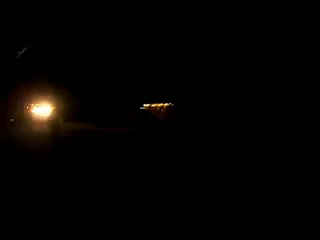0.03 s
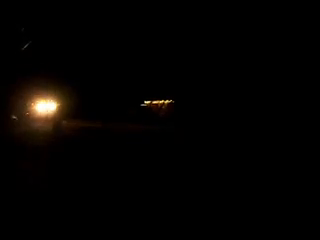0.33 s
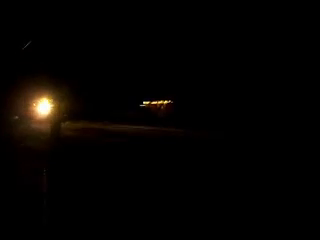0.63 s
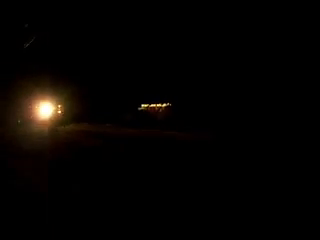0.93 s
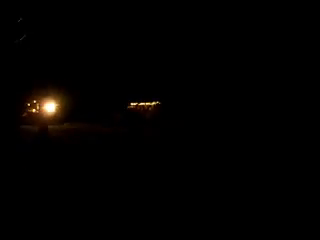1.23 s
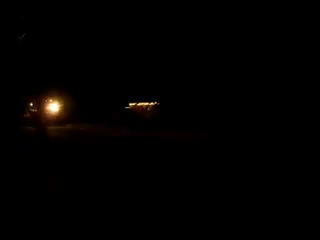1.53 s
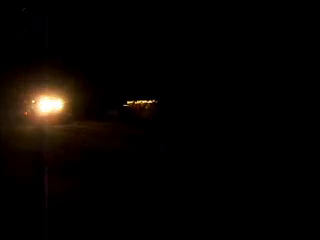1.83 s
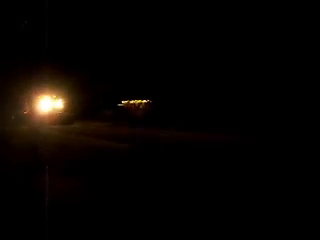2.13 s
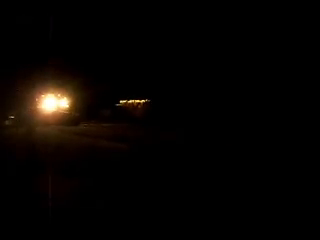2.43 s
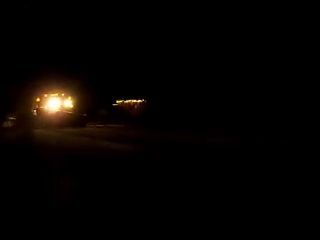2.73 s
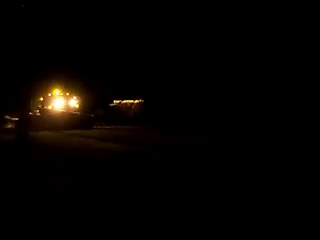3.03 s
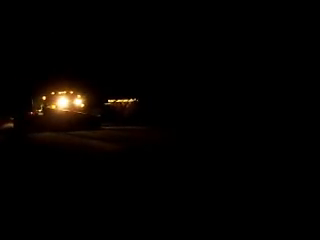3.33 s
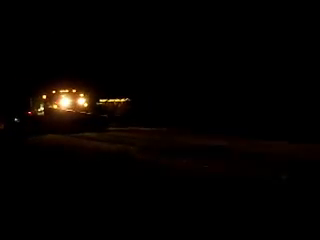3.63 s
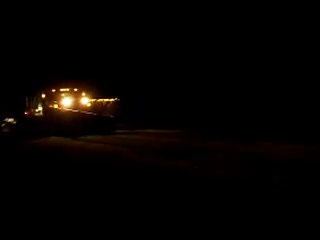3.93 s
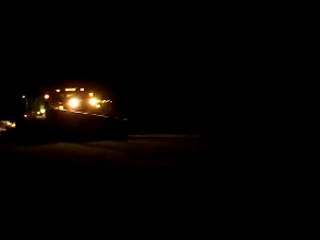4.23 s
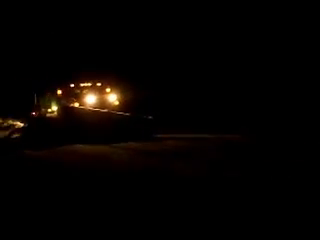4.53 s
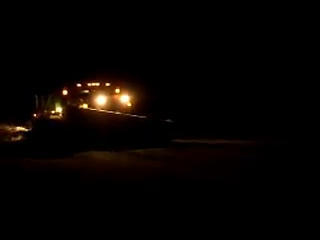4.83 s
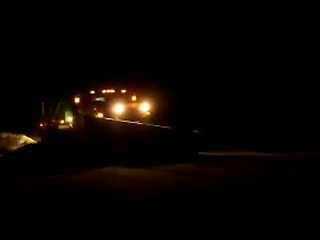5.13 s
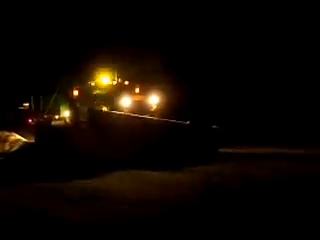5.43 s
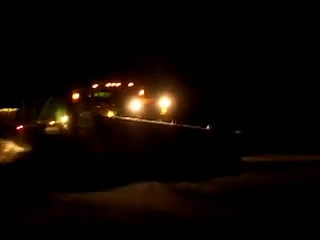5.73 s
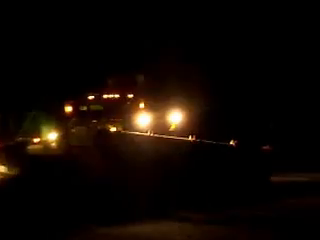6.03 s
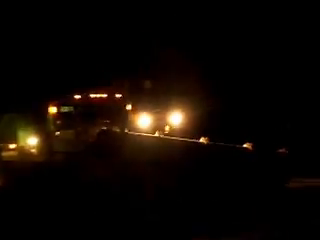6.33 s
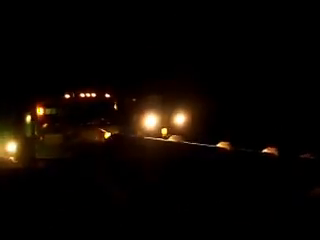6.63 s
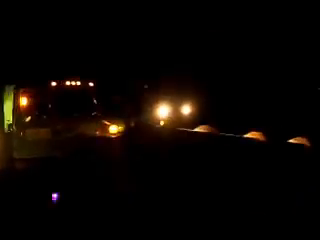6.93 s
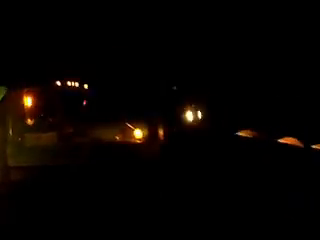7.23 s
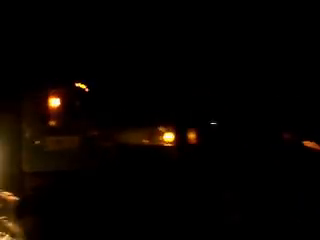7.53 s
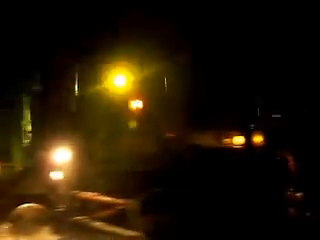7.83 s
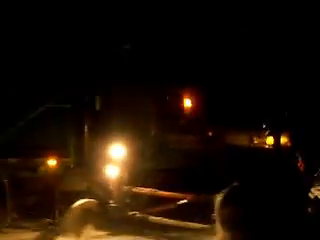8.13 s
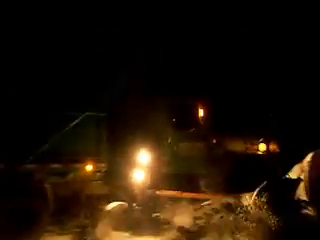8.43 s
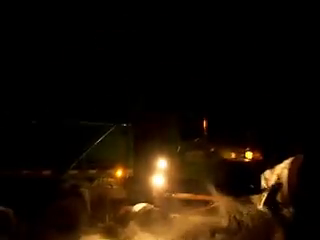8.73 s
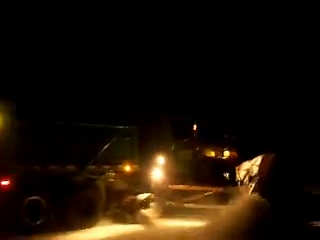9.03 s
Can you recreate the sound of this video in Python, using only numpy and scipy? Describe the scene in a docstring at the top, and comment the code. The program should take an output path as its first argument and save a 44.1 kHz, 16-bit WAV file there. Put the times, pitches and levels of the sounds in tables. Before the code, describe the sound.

Heard outdoors from a small roadside microphone, a plow blade grinds through snow and ice with irregular knocks, metal clinks and faint squeaks over a truck's low rumble. It grows louder as it nears, peaking in a deep, overloaded judder. Then the tyres thump by, the diesel engine drones past close with a slight fall in pitch, and a chain jingles softly.

```python
"""Beside a frozen road, one small camera microphone, 8.5 m from the line of a passing snowplow.
From far off the diesel drones, the tyres hum and the steel blade scrapes packed snow; it judders in three
low modes, knocks on ice, clinks its fittings and squeaks. Wheels thump in ruts as it nears. At 5.6 s the
strongest judder overloads the input, and at 6.3 s the blade is abreast. The engine and its fan come
forward as the cab goes by, around 7.5 s, and last a chain rattles behind the truck."""
import sys
import numpy as np
from scipy import signal
from scipy.fft import rfft, irfft, next_fast_len
from scipy.io import wavfile
from scipy.ndimage import map_coordinates

SR = 44100
rng = np.random.default_rng(int(sys.argv[2]) if len(sys.argv) > 2 else 0)


def bounce(signal):
    """Save signal as a 16-bit WAV file at the path given by the first command-line argument."""
    frames = np.transpose(np.atleast_2d(signal))
    limited = np.clip(frames, -1, 1)
    pcm = np.round(limited * 32767).astype(np.int16)
    wavfile.write(sys.argv[1], SR, pcm)


N = 400428
TIME = np.arange(N) / SR
# the truck drives straight past the microphone; the blade leads the engine
SPEED_M_PER_S, DISTANCE_M, BLADE_PASS_S, ENGINE_PASS_S = 12.5, 8.5, 6.3, 7.45
SOUND_M_PER_S = 343


def amp(db):
    """Decibels to gain."""
    return 10 ** (np.asarray(db) / 20)


def unit(x):
    """Scale to rms 1."""
    return x / np.sqrt(np.mean(x ** 2) + 1e-20)


def curves(rows):
    """One value per sample for each column after the time."""
    times, *columns = np.transpose(rows)
    return [np.interp(TIME, times, column) for column in columns]


def wobble(rate):
    """A smooth random curve, rate knots a second."""
    knots = rng.standard_normal(int(N * rate / SR) + 4)
    return map_coordinates(knots, [TIME * rate])


def coloured(x, points):
    """Filter x through points of f/Hz, gain/dB, joined on a log axis."""
    size = next_fast_len(len(x) + 8192)
    hz, db = np.transpose(points)
    gain = amp(np.interp(np.log(np.fft.rfftfreq(size, 1 / SR) + 1), np.log(hz), db))
    return irfft(rfft(x, size) * gain, size)[:len(x)]


def noise(points):
    """Coloured noise of rms 1."""
    return unit(coloured(rng.standard_normal(N), points))


def running_phase(hz):
    """The phase in radians of a moving frequency."""
    return 2 * np.pi * np.cumsum(hz) / SR


def ring(hz, width_hz, count):
    """A mode that keeps being disturbed, which widens it."""
    drift = np.cumsum(rng.standard_normal(count)) * np.sqrt(2 * np.pi * abs(width_hz) / SR)
    return np.sin(2 * np.pi * hz * np.arange(count) / SR + drift)


def struck(t, db, t60, attack_s):
    """The envelope of a blow: a quick rise, then 60 dB of decay in t60 seconds."""
    return amp(db - 60 * t / t60) * (1 - np.exp(-t / attack_s))


def add(track, s, sound):
    """Mix a sound into the track at s seconds."""
    part = track[max(round(s * SR), 0):][:len(sound)]
    part += sound[:len(part)]


def approach(pass_s):
    """Closeness (1 when abreast) and speed in m/s towards the microphone of a part of the truck."""
    ahead = SPEED_M_PER_S * (pass_s - TIME)
    distance = np.hypot(ahead, DISTANCE_M)
    return DISTANCE_M / distance, SPEED_M_PER_S * ahead / distance


# the diesel from the roadside: t/s, firing tone level/dB, exhaust drone level/dB
ENGINE_LEVELS = [(0, -40, -54), (4.5, -40.5, -45), (6, -26.5, -38), (7, -25, -33.5), (7.4, -27, -29),
                 (7.66, -38, -28), (7.76, -29, -30.5), (7.9, -26, -31), (8.3, -25.5, -39), (8.7, -28, -41),
                 (9.08, -36, -40)]
# colour of the exhaust: f/Hz, level/dB
EXHAUST_SPECTRUM = [(60, -31.5), (105, 0), (138, 4), (165, -8), (230, -10.5), (400, -28.5), (620, -18.5),
                    (820, -24), (1100, -22.5), (1600, -36.5), (2500, -36.5), (4000, -58.5)]


def engine(firing_hz, roughness, tone_db, drone_db):
    """Six cylinders fire in turn: a low tone and uneven exhaust puffs, sinking in pitch as they pass."""
    tone_level, drone_level = curves(ENGINE_LEVELS)
    _, towards = approach(ENGINE_PASS_S)
    doppler_hz = firing_hz / (1 - towards / SOUND_M_PER_S)
    phase = running_phase(doppler_hz + .25 * wobble(8))
    fired = np.flatnonzero(np.diff(phase // (2 * np.pi)))
    cylinders = amp(2.5 * rng.standard_normal(size=6))
    puffs = np.zeros(N)
    puffs[fired] = np.resize(cylinders, len(fired)) * amp(2 * rng.standard_normal(N)[fired])
    gas = noise(EXHAUST_SPECTRUM) * (1 + .5 * np.cos(phase))
    drone = unit(unit(coloured(puffs, EXHAUST_SPECTRUM)) + roughness * gas)
    return amp(tone_level + tone_db) * np.sqrt(2) * np.sin(phase) + amp(drone_level + drone_db) * drone


# tread hum, strongest while the truck is still up the road: t/s, level/dB
TREAD_LEVELS = [(0, -48.5), (2.4, -44), (3.4, -35.5), (4.3, -41.5), (5.3, -34), (6.2, -48), (7, -56),
                (9.08, -61)]


def tread(hz, width_hz, level_db):
    """The tread blocks strike the road at an even rate and hum."""
    hum = coloured(ring(hz, width_hz, N), [(120, -31), (220, 0), (310, 0.5), (600, -29.5)])
    return amp(curves(TREAD_LEVELS)[0] + level_db + 2.5 * wobble(12)) * unit(hum)


# rumble of tyres and chassis: t/s, level/dB
RUMBLE_LEVELS = [(0.1, -35), (2.5, -37.5), (3.3, -32.5), (3.7, -35.5), (4.3, -33.5), (5.1, -31),
                 (5.9, -25.5), (6.4, -30.5), (6.65, -25), (7.2, -33), (7.5, -31.5), (7.66, -32),
                 (7.78, -31.5), (8.0, -33), (8.15, -31.5), (8.65, -41.5), (9.08, -35.5)]
# its colour: f/Hz, level/dB
RUMBLE_SPECTRUM = [(70, -21.5), (130, -10.5), (200, -1), (260, 0.5), (310, -4), (380, -10), (600, -51.5)]


def tyres(rise_db, level_db, jolt_share):
    """Heavy tyres drum on the frozen ruts; each bite of the blade jolts the chassis."""
    rumble_db = curves(RUMBLE_LEVELS)[0] + level_db + jolt_share * rise_db + 1.5 * wobble(14)
    return amp(rumble_db) * noise(RUMBLE_SPECTRUM)


def crunch(per_s, spread_db, decay_s, share):
    """Snow breaks in small fractures: bursts of white noise that decay fast, over an even bed."""
    breaks = (rng.random(N) < per_s / SR) * amp(spread_db * np.clip(rng.standard_normal(N), -2, 2)) ** 2
    power = signal.lfilter([1], [1, -np.exp(-1 / (decay_s * SR))], breaks)
    return np.sqrt(1 - share + share * power / power.mean()) * rng.standard_normal(N)


def grit(count, low_hz, high_hz, t60, spread_db):
    """Stones caught under the edge make it tick at ever different pitches, the highest weakest."""
    out, t = np.zeros(N), np.arange(SR // 10) / SR
    for when, pitch, size in rng.random((count, 3)):
        hz = low_hz * (high_hz / low_hz) ** pitch
        envelope = np.sqrt(low_hz / hz) * amp(spread_db * size - 60 * t / t60)
        add(out, when * N / SR, envelope * np.sin(2 * np.pi * hz * t))
    return unit(out)


# how far the blade has turned from the microphone, shielded by the truck: t/s, share (0-1)
TURNED_AWAY = [(0, 0), (2.3, 0.26), (5.1, 0.62), (5.7, 0.91), (7.3, 0.95), (9.08, 0.77)]


def turning(x, ahead, passed):
    """The blade's sound changes colour as it swings from facing the microphone to passing by."""
    share = curves(TURNED_AWAY)[0]
    return (1 - share) * unit(coloured(x, ahead)) + share * unit(coloured(x, passed))


# the cutting edge on the road: t/s, grinding level/dB, snow spray level/dB
SCRAPE_LEVELS = [(0.25, -30, -35), (0.62, -31.5, -35), (0.98, -31.5, -35.5), (1.92, -29, -34.5),
                 (2.44, -31, -38), (3.35, -28, -31.5), (3.62, -30.5, -35), (5.02, -28, -36.5),
                 (5.19, -29, -39), (5.83, -31, -37), (6.37, -30.5, -41), (6.67, -30.5, -39),
                 (7.5, -36, -42), (7.65, -35, -42), (7.85, -36, -43), (8.35, -35.5, -42), (8.6, -35, -42),
                 (9.08, -36.5, -40)]
# grinding and spray, facing the microphone and turned away: f/Hz, level/dB
GRIND_FACING = [(250, -29.5), (390, -7), (490, 1), (660, 0), (790, -5), (920, -5), (1080, -3), (1300, -6),
                (1480, -14), (1800, -14.5), (2200, -23.5), (3200, -33.5)]
GRIND_AWAY = [(250, -33.5), (390, -6), (480, 5.5), (545, 3), (600, 3), (730, 1.5), (860, -9), (1060, -4.5),
              (1250, -8), (1480, -18.5), (1750, -18.5), (2200, -28), (3200, -44)]
SPRAY_FACING = [(900, -27.5), (1350, -2), (1750, 6), (2100, 2.5), (2450, 1), (2900, 0.5), (3900, -2.5),
                (4600, -4), (5400, -8), (7500, -10)]
SPRAY_AWAY = [(900, -33.5), (1700, 3), (2100, -0.5), (2430, 3), (2800, -1), (3300, -2.5), (3900, 0),
              (4600, -5), (5400, -5), (7500, -8)]


def scrape(rise_db, grind_db, spray_db, spray_share, grit_db, grit_shield_db, bounce_db):
    """The edge crushes packed snow; its changing pressure moves the grinding and the spray together."""
    grind_level, spray_level = curves(SCRAPE_LEVELS)
    pressure_db = bounce_db * wobble(28)
    coarse = crunch(per_s=120, spread_db=1.0, decay_s=0.0088, share=0.31)
    fine = crunch(per_s=740, spread_db=2.0, decay_s=0.0014, share=0.7)
    stones = grit(count=1100, low_hz=1069, high_hz=4490, t60=0.077, spread_db=14.5)
    grind = turning(coarse, GRIND_FACING, GRIND_AWAY)
    spray = turning(coarse + fine, SPRAY_FACING, SPRAY_AWAY)
    spray += amp(grit_db + grit_shield_db * curves(TURNED_AWAY)[0]) * stones
    grind *= amp(grind_level + grind_db + rise_db + pressure_db)
    spray *= amp(spray_level + spray_db + spray_share * rise_db + .5 * pressure_db)
    return grind + spray


# the blade digs in: t/s, hold/s, judder level/dB, mode (0-2), rise of the scraping/dB
BLADE_BITES = [(0.082, 0.069, -24, 2, 1.5), (0.212, 0.093, -26, 0, 3.5), (0.391, 0.086, -23.5, 0, 3),
               (0.418, 0.12, -27, 2, 0), (0.57, 0.1, -21.5, 0, 1.5), (0.7, 0.11, -34, 1, 2.5),
               (1.045, 0.19, -26.5, 1, -0.5), (1.359, 0.12, -28.5, 0, 3.5), (1.543, 0.11, -32, 1, 0),
               (1.786, 0.11, -18.5, 1, 1), (1.909, 0.078, -22, 0, 3.5), (2.044, 0.16, -25.5, 1, 1),
               (2.93, .12, -23.5, 1, 2), (3.081, 0.13, -18.5, 1, 3), (3.218, 0.12, -17.5, 0, 2.5),
               (3.326, 0.21, -21.5, 1, 0.5), (3.549, 0.21, -31.5, 1, -0.5), (3.854, 0.076, -25.5, 1, 0.5),
               (4.06, .11, -23, 1, 0.5), (4.39, 0.29, -34, 0, 0.5), (4.678, 0.27, -31, 1, 3.5),
               (5.088, 0.11, -21.5, 1, 5), (5.472, 0.05, -16, 2, 2.5), (5.569, 0.257, -7, 1, 5.5),
               (5.861, 0.24, -19.5, 1, 3), (6.121, 0.075, -17.5, 0, 1), (6.413, 0.17, -16, 1, 2),
               (6.521, 0.058, -12.5, 0, 4.5), (6.628, 0.032, -10, 0, 4.5), (6.674, .07, -14.5, 1, 2),
               (6.78, 0.14, -18.5, 2, 0), (6.822, 0.093, -15, 0, 4.5), (6.963, 0.087, -25, 2, 3),
               (7.203, 0.16, -26, 0, 2.5), (7.414, 0.079, -25.5, 0, 5)]


def bites(attack_s, release_s, sag_db_per_s):
    """Each bite builds, holds and dies away: gives each judder mode's drive and the scraping's rise."""
    drive, rise_db, t = np.zeros((len(LOW_MODES), N)), np.zeros(N), np.arange(SR) / SR
    for s, hold, db, mode, scrape_db in BLADE_BITES:
        release = np.exp(-np.maximum(t - hold, 0) / release_s)
        shape = np.minimum(t / attack_s, 1) * amp(-sag_db_per_s * t) * release
        add(drive[mode], s, amp(db) * shape)
        add(rise_db, s, scrape_db * shape)
    return drive, rise_db


# the blade's judder modes: f/Hz, unsteadiness/Hz, level between bites/dB
LOW_MODES = [(50.1, 3.45, -48), (66.46, 1.513, -38), (95.2, 6.09, -44.5)]


def judder(drive, level_db, frame_db, near_db, behind_db, crosstalk_db, strain_limit_db):
    """The blade sticks and slips, shaking its frame in three modes; once past, the truck hides it."""
    closeness, towards = approach(BLADE_PASS_S)
    receding = np.maximum(-towards / SPEED_M_PER_S, 0)
    nearness = amp(near_db * closeness + behind_db * receding)
    # every bite stirs all three modes and the frame, up to a limit
    strain = np.minimum(drive.sum(0), amp(strain_limit_db))
    shake = np.zeros(N)
    for (hz, drift_hz, idle_db), bite in zip(LOW_MODES, drive):
        idle = amp(idle_db + 3.4 * wobble(9)) * nearness
        size = np.sqrt(bite ** 2 + idle ** 2 + (amp(crosstalk_db) * strain) ** 2)
        shake += size * np.sqrt(2) * np.sin(running_phase(hz + drift_hz * wobble(16)))
    # the rough road shakes the frame between its modes too
    frame = noise([(12, -28), (28, -11.5), (42, 1), (60, 0), (105, -6), (140, -27), (400, -69.5)])
    return amp(level_db) * shake + np.hypot(amp(frame_db) * strain, amp(-38.5) * nearness) * frame


# blade on ice: t/s, level/dB, t60/s, relative crack/dB, upper modes/dB, favoured f/Hz
ICE_KNOCKS = [(.105, -27, .2, -6, 3, 1000), (.208, -23, .2, -9, -1, 1140), (.238, -22, 0.17, -14, -6, 1140),
              (.31, -26, 0.14, -14, -4, 550), (.41, -27, 0.31, -13, 3, 1010), (.59, -27, 0.22, -8, 6, 1820),
              (.725, -20, 0.17, -8, 2, 1820), (.8, -25.5, .18, -1, -6, 485),
              (1.238, -22.5, 0.31, -21, -4.5, 485), (1.798, -16, 0.14, -17, -11, 650),
              (2.072, -22, 0.082, 0, -4, 1325), (2.084, -21.5, .26, -12, 5, 1140),
              (2.86, -23.5, 0.24, -22, -19, 485), (3.161, -26, 0.065, 7, -8, 550),
              (3.172, -13, .19, -21.5, -4, 550), (3.259, -19, 0.14, 4, 7, 1820),
              (3.327, -18.5, 0.19, -2, 5, 1140), (3.408, -22, .07, 4, -4, 650),
              (3.473, -27, .05, 6, -2, 650), (3.978, -22.5, 0.28, -3.5, -5.5, 1325),
              (4.119, -24, .28, -20, -2, 1140), (4.318, -22.5, .17, -3.5, -7, 485),
              (4.548, -20, .11, -23, -21, 550), (4.572, -21.5, 0.18, -6, -4, 650),
              (4.612, -16.5, 0.18, -23, -15, 550), (4.675, -13, 0.14, -7, 0.5, 550),
              (4.752, -14, 0.18, -5, 1, 1010), (4.814, -18.5, 0.21, -8, 3, 1325),
              (4.885, -17, 0.16, -5.5, 4, 650), (4.93, -21, .14, -13, -9, 650),
              (4.968, -24, .12, -14, 10, 1630), (5.043, -10, 0.16, -6.5, -4, 650),
              (5.376, -21.5, 0.19, -19, -4, 650), (5.563, -15, 0.13, -14, -10, 645),
              (5.64, -20.5, 0.39, -10, 2, 1820), (5.724, -22, 0.26, 9, -7, 765),
              (5.841, -18.5, 0.36, -17, -9, 765), (5.915, -16.5, .18, -17, -15, 485),
              (6.156, -16.5, 0.27, -9, -11, 485), (6.33, -23.5, .16, -21, -15, 550),
              (6.498, -16.5, 0.14, -25, -24, 485), (6.535, -19, .069, 4, -9, 650),
              (6.558, -23, 0.053, -2, -15, 550), (6.623, -13, .11, -4, -20, 650),
              (6.653, -11.5, 0.12, -16, -14, 650), (6.7, -22, 0.13, -1, -8, 650),
              (6.733, -16, 0.25, -27, -26, 550), (6.861, -29, .16, 7, -12, 650),
              (6.888, -20, 0.21, -4, -5, 1630)]
# the blade's plate modes: f/Hz, width/Hz, level/dB
PLATE_MODES = [(487.7, 22, -6.5), (550.4, 19, -3), (644, 24, -4), (768, 33, -5.5), (913, 49, 0),
               (1011, 21, 0), (1144, 25, 0), (1325, 46, 0), (1633, 31, -5), (1850, 37, -4.5),
               (2440, 140, -13), (3490, 52, -13), (4020, 120, -13.5), (4900, 30, -18.5)]
# colours of a knock's thud and of its sharp crack: f/Hz, level/dB
THUD_SPECTRUM = [(150, -29.5), (450, -11), (650, -5), (1150, 10.5), (1500, -1.5), (2100, -3), (3000, -19.5),
                 (4000, -14.5), (5200, -21.5), (7500, -14.5)]
CRACK_SPECTRUM = [(300, -22), (1000, -5), (2200, 0.5), (3000, -5.5), (4000, -2), (5200, -7.5), (7500, -7)]


def knocks(level_db, attack_s, vary_db, thud_db, thud_share, favour_db, favour_octaves):
    """Ice ridges crack against the snow-damped plate; the point of contact picks which mode rings most."""
    out, t = np.zeros(N), np.arange(SR // 3) / SR
    for s, db, t60, crack_db, upper_db, favoured_hz in ICE_KNOCKS:
        modes = np.zeros(len(t))
        for hz, width_hz, mode_db in PLATE_MODES:
            contact_db = favour_db * np.exp(-(np.log2(hz / favoured_hz) / favour_octaves) ** 2)
            # the upper modes radiate forwards: weaker off axis, and when the blow is soft
            gain = amp(mode_db + contact_db + upper_db * (hz > 850) + vary_db * rng.standard_normal())
            modes += gain * ring(hz, width_hz, len(t))
        thud = unit(coloured(rng.standard_normal(len(t)), THUD_SPECTRUM))
        thud *= amp(thud_db + thud_share * upper_db)
        crack = unit(coloured(rng.standard_normal(len(t)), CRACK_SPECTRUM))
        crack *= amp(crack_db - 40 * t / t60)
        add(out, s, struck(t, db + level_db, t60, attack_s) * (unit(modes) + thud + crack))
    return out


# jolts to the steel fittings: t/s, level/dB, fitting
FITTING_JOLTS = [(.412, -30.5, "shackle"), (.49, -31.5, "shackle"), (1.392, -37.5, "pin"),
                 (1.517, -39, "pin"), (2.074, -22, "bracket"), (3.092, -27.5, "shackle"),
                 (3.262, -17.5, "linkage"), (3.409, -31, "bracket"), (3.409, -33.5, "pin"),
                 (3.66, -36, "pin"), (3.697, -39, "pin"), (3.845, -34.5, "pin"), (5.501, -33.5, "shackle"),
                 (5.571, -17, "linkage"), (5.656, -26, "shackle"), (5.758, -32, "shackle"),
                 (5.859, -29.5, "shackle"), (6.16, -24, "linkage"), (6.566, -30, "linkage"),
                 (6.896, -29.5, "linkage"), (7.434, -34.5, "shackle"), (7.478, -31, "chain"),
                 (8.44, -36, "chain"), (8.475, -42, "chain"), (8.515, -43, "chain"), (8.582, -31, "chain"),
                 (8.603, -39, "chain"), (8.675, -44, "chain"), (8.742, -35, "chain"), (8.974, -40, "chain")]
# each fitting's modes, widened by its chatter: f/Hz, level/dB, t60/s, width/Hz
FITTING_MODES = {"bracket": [(1130, -3, 0.24, 30), (1673, -0.5, .24, 51), (2860, -16.5, 0.2, 26),
                 (3470, -2, 0.19, 16), (4260, -8, 0.097, 30), (4990, 1, 0.059, 60), (6560, -12, 0.069, 50),
                 (7080, -5.5, .08, 50)], "pin": [(3570, 3, .15, 60), (5400, 1.5, 0.13, 49),
                 (5560, -3, .1, 70), (6640, -1, 0.14, 55)], "shackle": [(1714, -1, 0.21, 140),
                 (1844, -5, .1, 170), (2070, -3.5, 0.12, 180), (2436, 2, 0.2, 220), (2594, -5, 0.26, 200),
                 (2930, -10.5, .18, 150)], "linkage": [(1393, -9.5, .07, 92), (1853, -2.5, 0.1, 71),
                 (2186, -2, 0.062, 55), (2850, -6, .04, 87), (3600, -17.5, .12, 55)],
                 "chain": [(1580, -4.5, 0.097, 70), (1810, -9, .07, 70), (2430, -1.5, .1, 70),
                 (3320, -3.5, 0.055, 80), (4230, -8.5, 0.075, 62)]}


def clinks(level_db, detune_share):
    """Jolted steel fittings and a chain ring; the loosest vary most in pitch from clink to clink."""
    out, t = np.zeros(N), np.arange(SR // 3) / SR
    for s, db, fitting in FITTING_JOLTS:
        for hz, mode_db, t60, width_hz in FITTING_MODES[fitting]:
            mode = ring(hz + detune_share * width_hz * rng.standard_normal(), width_hz, len(t))
            clink_db = db + level_db + mode_db + rng.normal(0, 1.0)
            add(out, s, struck(t, clink_db, t60, attack_s=0.0019) * mode)
    return out


# squeaks of the edge: peak t/s, length/s, f/Hz, level/dB, glide/Hz
EDGE_SQUEAKS = [(.62, .07, 3500, -40, 0), (.68, .06, 3480, -42, 0), (0.748, .026, 4720, -36, 0),
                (1.588, .06, 3540, -39, 0), (3.485, .04, 3750, -36, 0), (4.132, .07, 3530, -44, 0),
                (4.224, .08, 3940, -38.5, 0), (4.323, .033, 4000, -40, 0), (4.44, .06, 3550, -44, 0),
                (4.52, .06, 3550, -42, 0), (4.679, .03, 3890, -30, -200), (4.769, .016, 4790, -32, 0),
                (4.888, .018, 4590, -30.5, -800), (4.895, .022, 3900, -32, -200), (4.96, .16, 3540, -42, 0),
                (5.049, .018, 4800, -29, -900), (5.118, .078, 4160, -41, 0), (5.217, .08, 4060, -43, 0),
                (5.39, .07, 4150, -44, -2), (5.927, .12, 3930, -43, -3), (6.05, .13, 4110, -43, -2),
                (6.97, .13, 3830, -41.5, 1), (7.38, .09, 3810, -40, 0), (8.543, .082, 3960, -46, 0)]


def squeaks(level_db):
    """The steel edge sings thinly as it slides on bare ice; squeaks after hard blows drop in pitch."""
    out = np.zeros(N)
    for s, length, hz, db, glide_hz in EDGE_SQUEAKS:
        swell = np.hanning(int(length * SR))
        waver = np.cumsum(rng.normal(0, .022, SR))[:len(swell)]
        pitch = hz + glide_hz * np.linspace(-.5, .5, len(swell))
        add(out, s - length / 2, amp(db + level_db) * swell * np.sin(running_phase(pitch) + waver))
    return out


# wheels in ruts: t/s, level/dB, f/Hz, t60/s
RUT_THUMPS = [(1.788, -24.5, 187, 0.18), (3.257, -21, 168, 0.14), (5.905, -20, 249, 0.29),
              (6.497, -23, 150, 0.1), (6.62, -20, 243, 0.18), (6.735, -26.5, 242, 0.2),
              (6.855, -22, 165, 0.27), (6.9, -25, 230, 0.15), (7.41, -19, 124, 0.31),
              (7.505, -21.5, 145, 0.23), (7.605, -21.5, 139.5, .3)]


def thumps(level_db, attack_s, width_hz):
    """A heavy wheel drops into a rut and its tyre booms briefly."""
    out, t = np.zeros(N), np.arange(SR // 2) / SR
    for s, db, hz, t60 in RUT_THUMPS:
        boom = coloured(ring(hz, width_hz, len(t)), [(350, 0.5), (1000, -37)])
        add(out, s, struck(t, db + level_db, t60, attack_s) * np.sqrt(2) * boom)
    return out


# rush of the cooling fan: f/Hz, level/dB
FAN_SPECTRUM = [(90, -26), (150, -2.5), (300, 0), (400, -7), (520, -8), (680, -2.5), (900, -13),
                (1300, -24), (4000, -45)]


def fan(peak_s, spread_s, level_db):
    """The cooling fan's rush beams out of the wheel arch for the moment that it faces the microphone."""
    beam = np.exp(-((TIME - peak_s) / spread_s) ** 2)
    return amp(level_db) * beam * noise(FAN_SPECTRUM)


def scene():
    """Blade, wheels and engine in the open air, in mono from one spot at the roadside."""
    drive, rise_db = bites(attack_s=0.019, release_s=0.044, sag_db_per_s=12.5)
    blade = judder(drive, level_db=-0.5, frame_db=-6, near_db=9.5, behind_db=-4.5,
                   crosstalk_db=-21, strain_limit_db=-15)
    blade += scrape(rise_db, grind_db=-0.5, spray_db=-1, spray_share=0.87,
                    grit_db=-8, grit_shield_db=-0.5, bounce_db=1.1)
    blade += knocks(level_db=-3, attack_s=0.00088, vary_db=2.5, thud_db=-8, thud_share=0.96,
                    favour_db=6.5, favour_octaves=0.084)
    blade += clinks(level_db=0, detune_share=.4)
    blade += squeaks(level_db=1)
    truck = tyres(rise_db, level_db=-0.5, jolt_share=0.33)
    truck += thumps(level_db=2, attack_s=0.009, width_hz=34)
    truck += engine(firing_hz=76.84, roughness=2.2, tone_db=-2.5, drone_db=1.5)
    truck += tread(hz=262, width_hz=14.7, level_db=-0.5)
    truck += fan(peak_s=7.63, spread_s=0.088, level_db=-27.5)
    return (blade + truck)[None]


# response of the camera's microphone: f/Hz, gain/dB
MIC_RESPONSE = [(20, -0.5), (5300, 0.5), (5650, -4.5), (6000, -15.5), (6600, -10.5), (7050, -20),
                (7500, -30.5), (7800, -51)]
START_S, INPUT_CEILING, TOP_HZ = .061, .295, 7763


def record(dry):
    """The roadside camera starts, cuts the loudest peaks flat and keeps little treble."""
    running = TIME >= START_S
    # a strong judder holds the input at its ceiling and chops the scraping twice a cycle
    clipped = np.clip(dry[0], -INPUT_CEILING, INPUT_CEILING)
    heard = coloured(clipped * running, MIC_RESPONSE)
    passband = np.fft.rfftfreq(N, 1 / SR) < TOP_HZ
    return irfft(rfft(heard) * passband, N)[None]


dry = scene()
out = record(dry)
bounce(out)
```